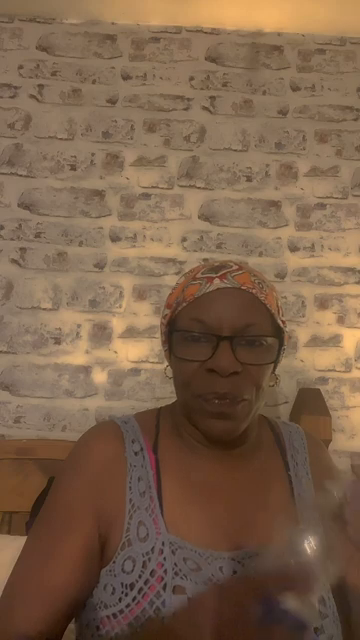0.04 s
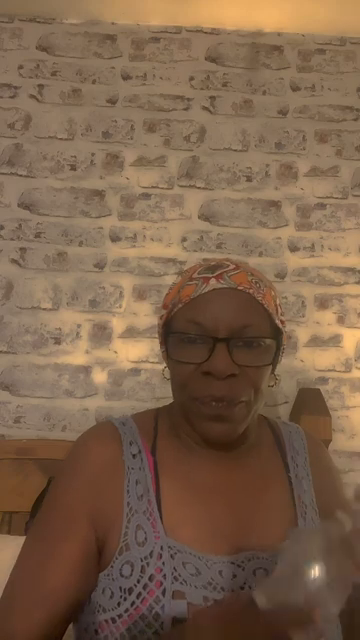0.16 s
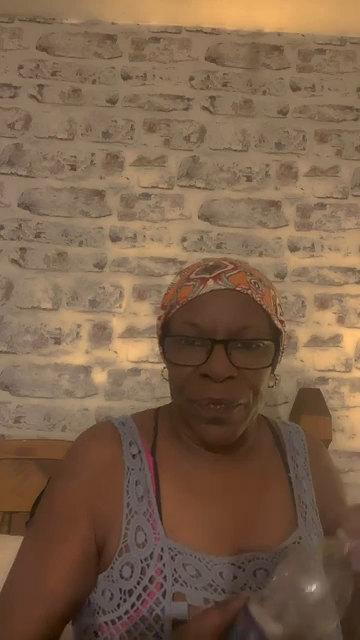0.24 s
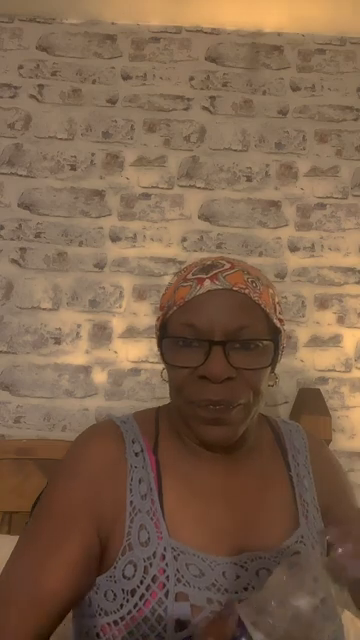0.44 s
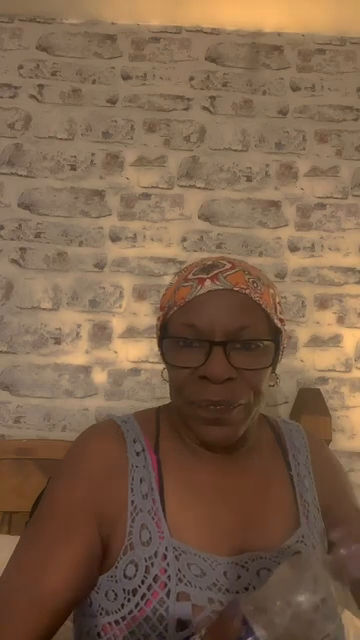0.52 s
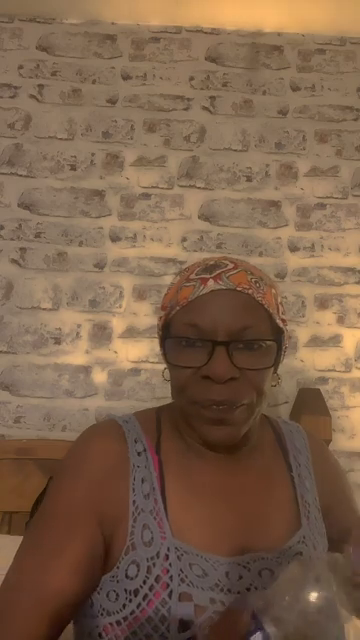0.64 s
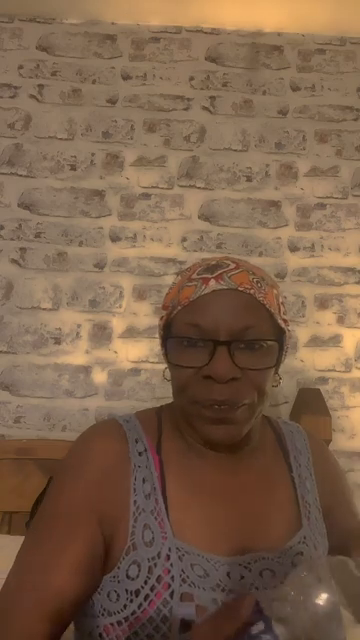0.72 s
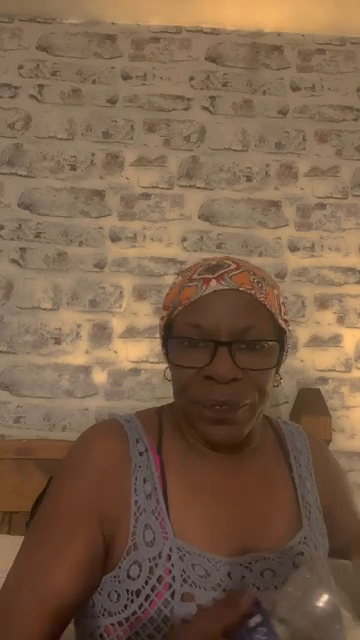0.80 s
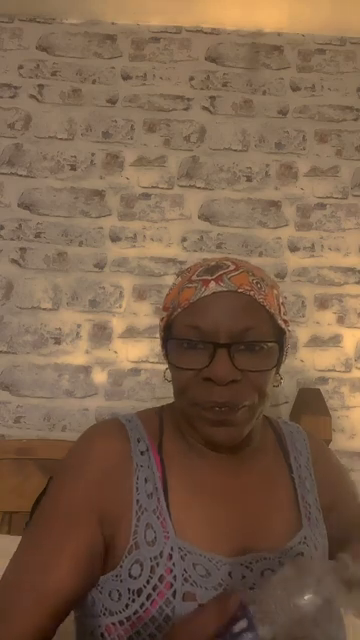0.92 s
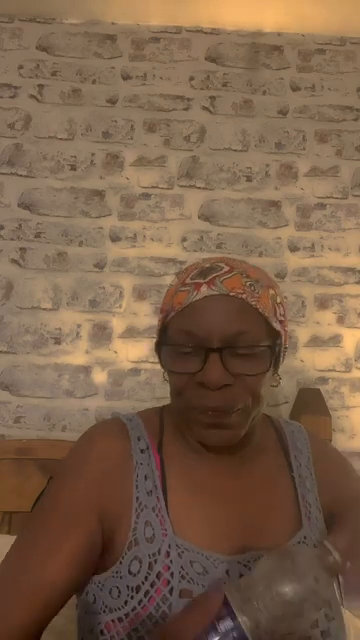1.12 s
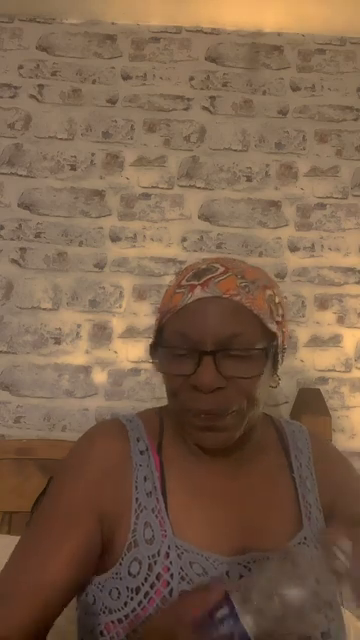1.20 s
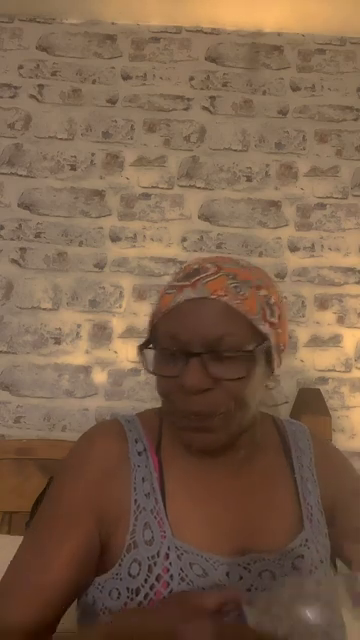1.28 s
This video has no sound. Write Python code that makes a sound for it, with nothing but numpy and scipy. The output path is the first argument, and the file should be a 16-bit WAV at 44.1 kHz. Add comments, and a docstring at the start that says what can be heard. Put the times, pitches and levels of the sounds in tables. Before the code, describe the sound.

A thin plastic bottle is squeezed and handled close to the microphone, its wall popping loudly twice early on, then giving smaller clicks and faint finger rustle over light hiss in a small furnished room.

```python
"""Snapping wall of a thin plastic bottle

A thin plastic water bottle is handled in a small furnished room: dents in its wall snap in and out, some loud, many soft.
Each snap is a short noise burst, dispersed so that its bass trails its treble, with decaying shell modes,
wall echoes and a diffuse tail; loud ones add a cascade of tiny snaps. Slow decaying sines make the whole body boom.
Fingers rustle as shaped noise with ticks, over a swelling low rumble and a steady hiss."""
import sys
import numpy as np
from scipy import signal
from scipy.fft import rfft, irfft, next_fast_len
from scipy.io import wavfile

SR = 44100
rng = np.random.default_rng(int(sys.argv[2]) if len(sys.argv) > 2 else 0)


def how_loud(loudness_db):
    """Turn decibels into a plain amplitude multiplier (0 dB gives 1, 20 dB gives 10)."""
    steps = np.asarray(loudness_db, float) / 20
    return 10 ** steps


def persist_wave(psi):
    """Save psi, clipped to +-1, as 16-bit WAV."""
    counts = np.round(np.clip(psi, -1, 1) * 32767).astype(np.int16)
    wavfile.write(sys.argv[1], SR, np.atleast_2d(counts).T)


N = 59535  # length [samples]

# Dents that snap: (time [s], level near 3 kHz before CRACK_DB [dB],
# then relative to it: bass [dB], low middle [dB], upper middle [dB], treble [dB])
SNAPS = [(0.0354, -30.5, -8, 15.5, -4, -5), (0.099, -50, -8, -8, 0, 9), (0.103, -30, -28, -4.5, -21, -3.5),
         (0.112, -36.5, -11.5, -13, -1.5, -3), (.2166, -14, 2.5, 3, 8, 5.5), (.2232, -19.5, -22, 0, 9, -22),
         (0.252, -27, -21, -16, -8, 3), (0.3721, -10, -7, -1.5, -2.5, 8.5),
         (.3795, -12.5, -8, -3.5, -16, -4), (0.3835, -16, -6.5, 7.5, -1, 8.5),
         (0.3911, -37, -25, -6, -12, 3), (0.524, -25.5, 0, -11, -2, -11.5),
         (0.5253, -28, -4, -10, -3.5, -3.5), (.5356, -24, -12, -15, -9, -7),
         (0.5745, -24.5, -12.5, 4.5, -8, -8), (0.6501, -21.5, -3, -2.5, 1.5, 15.5),
         (0.6576, -32, -30, 10.5, 2, 16), (0.667, -45, 4, -21, 19.5, 27.5), (0.769, -33.5, 2, 0.5, -4, -12),
         (0.777, -29.5, -3, -1, -8, -9), (0.781, -24, -1, -1, -8, -8), (0.8657, -23, -7, -12, -14, -7.5),
         (0.872, -26, -11, -13, -9, -10), (.942, -42.5, -5, -3, 6, 4), (0.999, -55, -14, -3, 7, 0),
         (1.0021, -30, -2.5, 3, -3.5, 2), (1.0226, -34, -13, -18, -2, -14),
         (1.0288, -45, -25, 9.5, -4, -11), (1.0399, -34, -8, 4, -1, 0), (1.0455, -31.5, 2.5, 0, 0, -7),
         (1.302, -30, -8, -1, -5, -6), (1.306, -36, 7, 11.5, -7, -5), (1.335, -40, -11, -20, -13, -9),
         (1.346, -33.5, 2, -3, -16, 0)]
# Frequencies of the snap's tone: bass, low middle, reference, upper middle, treble, very top: (frequency [Hz])
TONE_HZ = [450, 1350, 2900, 5000, 9500, 14000]
# Modes of the shell: (frequency [Hz], relative level [dB], t60 [s])
SHELL_MODES = [(344, -11, 0.15), (505, -3, 0.082), (636, -4, 0.1), (1342, -1, 0.023), (1590, -6.5, 0.032),
               (2228, -0.5, 0.02), (2774, 4.5, 0.025), (4430, -17, 0.0085), (5683, 8, 0.024)]
# Early reflections from the walls: (delay [s], level [dB])
WALL_ECHOES = [(.0072, -14), (0.0121, -19), (.0185, -20.5)]
# Reverberation time of the room: (frequency [Hz], t60 [s])
ROOM_T60 = [(150, 0.08), (500, 0.34), (1500, 0.18), (4000, 0.24), (9000, 0.25), (15000, 0.057)]
# Whole-bottle resonances as large dents move: (time [s], level [dB], frequency [Hz], t60 [s])
BOOMS = [(.218, -26, 217.4, 0.22), (0.374, -28.5, 183, 0.13), (.785, -36, 168.5, 0.089),
         (0.875, -49, 209, 0.075), (1.006, -40.5, 176, 0.075), (1.049, -40, 166, 0.064),
         (1.306, -42.5, 176, 0.14)]
# Course of the finger friction: (time [s], level [dB])
RUSTLE_LEVEL = [(0, -53), (0.092, -60.5), (.15, -62.5), (.2, -55.5), (.47, -65.5), (.51, -47.5),
                (.6, -57.5), (.72, -73), (.8, -73), (.93, -57), (.99, -65.5), (1.06, -68), (1.12, -67.5),
                (1.17, -52.5), (1.218, -56.5), (1.27, -73), (1.319, -48), (1.35, -44)]
# Spectrum of the finger friction: (frequency [Hz], relative density [dB per Hz])
RUSTLE_SPECTRUM = [(120, -53), (200, -24), (432, -12.5), (1180, -3), (1870, -18), (2290, -4), (3370, -12),
                   (16000, -30)]
# Course of the low noise: (time [s], level [dB])
RUMBLE_LEVEL = [(0, -77), (.49, -61), (.54, -54), (.62, -61.5), (.7, -72), (.85, -92), (0.888, -52.5),
                (.95, -72), (1.281, -66), (1.331, -54.5)]
# Spectrum of the low noise: (frequency [Hz], relative density [dB per Hz])
RUMBLE_SPECTRUM = [(35, -36), (65, -12), (110, -4.5), (170, -3), (300, -50)]
# Spectrum of the steady noise: (frequency [Hz], relative density [dB per Hz])
HISS_SPECTRUM = [(15, -47), (25, -24.5), (197, 2), (313, -6.5), (651, -8), (1390, -16.5), (4360, -23.5),
                 (4730, -20.5), (8830, -12), (14400, -18), (16500, -14)]
# Overall colouring of the snaps, with little left above 16 kHz: (frequency [Hz], gain [dB])
SNAP_COLOUR = [(100, -27), (150, -8.5), (260, 10.5), (5400, 3), (6400, -2.5), (8200, 4.5), (9500, 5),
               (10000, -6.5), (12000, -4), (15700, 1), (16200, -26)]

CRACK_S, RISE_S, CRACK_DB = 0.0088, 0.0005, 15  # burst t60 and rise before evening; gain of the whole snap
EVEN = 0.6  # how far the crack's spectrum is evened out, 0-1
LAG_S, LAG_HZ = 0.0022, 400  # bending-wave delay at LAG_HZ, before the delay at the very top is taken off
SHELL_DB, SHELL_SCATTER_DB = -36, 3  # level of the modes, and its random spread per mode
LOUD_DB = -24  # louder snaps set off a cascade
SOFT_TOP_DB = -5  # soft snaps are duller at the very top
CASCADE_DB, CASCADE_S = -3, 0.2  # energy over the crack; t60
CASCADE_PER_S, CASCADE_SPREAD_DB = 1500, 3.5
ROOM_DB, ROOM_GAP_S = -8, 0.004  # energy of the tail over the crack; time scale of its onset
BOOM_RISE_S = 0.0024
TICKS_PER_S, TICK_SPREAD_DB, TICK_SHARE = 1500, 2, 0.2  # share: of the power, before the spectrum is shaped
HISS_DB = -54.5
TOP_HZ, STEADY_TOP_HZ = 17100, 15900  # upper limits of the mix, and of the noises, tails and cascades


def unit(x):
    """Normalisation to rms 1."""
    return x / np.sqrt(np.mean(x ** 2) + 1e-20)


def along(points, hz):
    """Linear interpolation of (frequency, value) points on a logarithmic frequency axis."""
    f, v = np.transpose(points)
    return np.interp(np.log(hz + 1), np.log(f + 1), v)


def filtered(x, response):
    """Linear filtering: the spectrum is multiplied by a complex response of frequency."""
    m = next_fast_len(len(x) + 8192)
    hz = np.fft.rfftfreq(m, 1 / SR)
    return irfft(rfft(x, m) * response(hz), m)[:len(x)]


def bottle():
    """Superposition: the snaps add linearly, each at its moment."""
    out = np.zeros(N + SR)
    for s, *levels in SNAPS:
        one = snap(*levels)
        start = round(s * SR) - 64  # snap() begins with 64 samples of padding
        out[start:][:len(one)] += one
    return out[:N]


def snap(db, bass_db, low_db, high_db, treble_db):
    """Impulsive buckling: a crack and shell modes, dispersed in the wall and answered by the room."""
    t = np.arange(SR // 3) / SR
    direct = crack(t) + shell_ring(t)
    loud = db + max(treble_db, 0) > LOUD_DB
    after = how_loud(ROOM_DB) * room_tail() + loud * how_loud(CASCADE_DB) * cascade(t)
    sound = filtered(direct, wall_echoes) + filtered(after, lambda hz: hz < STEADY_TOP_HZ)
    very_top_db = treble_db + SOFT_TOP_DB * (1 - loud)
    tone = list(zip(TONE_HZ, [bass_db, low_db, 0, high_db, treble_db, very_top_db]))
    padded = np.pad(sound, (64, 0))  # space for the pitches that come early
    shaped = filtered(padded, lambda hz: how_loud(along(tone, hz)) * bending_dispersion(hz))
    return how_loud(db + CRACK_DB) * shaped


def crack(t):
    """Impulsive excitation: a decaying noise burst, its spectrum partly evened, of energy 1."""
    t = t[:512]
    burst = rng.standard_normal(512) * how_loud(-60 * t / CRACK_S) * (1 - np.exp(-t / RISE_S))
    spectrum = rfft(burst)
    evened = irfft(spectrum / (np.abs(spectrum) + 1e-9) ** EVEN)
    evened = evened * np.minimum(1, np.arange(512, 0, -1) / 400)  # fades to the end
    return np.pad(evened / np.linalg.norm(evened), (0, SR // 3 - 512))


def shell_ring(t):
    """Modal superposition: the shell rings as exponentially damped sines."""
    ring = np.zeros(len(t))
    for hz, level, t60 in SHELL_MODES:
        scatter = rng.normal(0, SHELL_SCATTER_DB)
        ring += how_loud(level + scatter - 60 * t / t60) * np.sin(2 * np.pi * hz * t)
    return how_loud(SHELL_DB) * ring


def bending_dispersion(hz):
    """Bending-wave dispersion: group delay falls as one over the root of frequency."""
    # group delay integrated over frequency, less the delay at the very top
    cycles = LAG_S * (2 * np.sqrt(LAG_HZ * hz) - hz * np.sqrt(LAG_HZ / TONE_HZ[-1]))
    return np.exp(-2j * np.pi * cycles)


def cascade(t):
    """Random impulse process: a fading crowd of tiny noise bursts, energy 1."""
    struck = rng.random(len(t)) < CASCADE_PER_S / SR
    hits = struck * how_loud(CASCADE_SPREAD_DB * rng.standard_normal(len(t)) - 60 * t / CASCADE_S)
    envelope = np.convolve(hits, how_loud(-60 * t[:256] / CRACK_S))[:len(t)]
    crowd = envelope * rng.standard_normal(len(t))
    return crowd / (np.linalg.norm(crowd) + 1e-9)


def wall_echoes(hz):
    """Specular reflection: each wall adds a delayed, weaker copy."""
    return 1 + sum(how_loud(level) * np.exp(-2j * np.pi * hz * delay) for delay, level in WALL_ECHOES)


def room_tail():
    """Diffuse reverberation: fresh noise of energy 1 decays at a rate set by frequency."""
    hz, t, z = signal.stft(rng.standard_normal(SR // 3), SR, nperseg=128)
    decay = how_loud(-60 * t / along(ROOM_T60, hz)[:, None])
    tail = signal.istft(z * decay, SR, nperseg=128)[1][:SR // 3]
    onset = 1 - np.exp(-(np.arange(len(tail)) / SR / ROOM_GAP_S) ** 2)
    tail = tail * onset
    return tail / np.linalg.norm(tail)


def booms():
    """Damped free vibration: the whole body rings as low decaying sines."""
    out, t = np.zeros(N + SR), np.arange(SR // 3) / SR
    rise = 1 - np.exp(-t / BOOM_RISE_S)
    for s, db, hz, t60 in BOOMS:
        ring = how_loud(db - 60 * t / t60) * np.sin(2 * np.pi * hz * t)
        out[round(s * SR):][:len(t)] += ring * rise
    return out[:N]


def noise_course(noise, course, spectrum):
    """Amplitude modulation: spectrally shaped noise follows a level course."""
    s, db = np.transpose(course)
    level = how_loud(np.interp(np.arange(N) / SR, s, db))
    return level * unit(filtered(noise, lambda hz: how_loud(along(spectrum, hz))))


def fingers():
    """Sliding friction: skin on plastic gives soft noise mixed with tiny random ticks."""
    struck = rng.random(N) < TICKS_PER_S / SR
    ticks = struck * how_loud(TICK_SPREAD_DB * rng.standard_normal(N)) * rng.standard_normal(N)
    rub = np.sqrt(TICK_SHARE) * unit(ticks) + np.sqrt(1 - TICK_SHARE) * rng.standard_normal(N)
    return noise_course(rub, RUSTLE_LEVEL, RUSTLE_SPECTRUM)


def rumble():
    """Low-frequency random vibration: band-shaped noise swells while the hands shift."""
    return noise_course(rng.standard_normal(N), RUMBLE_LEVEL, RUMBLE_SPECTRUM)


def hiss():
    """Stationary random noise: room air and microphone give a shaped steady hiss."""
    return how_loud(HISS_DB) * unit(filtered(rng.standard_normal(N), lambda hz: how_loud(along(HISS_SPECTRUM, hz))))


def scene():
    """Superposition: snaps coloured by an overall response, with booms, rustle, rumble and hiss."""
    steady = filtered(fingers() + rumble() + hiss(), lambda hz: hz < STEADY_TOP_HZ)
    snaps = filtered(bottle(), lambda hz: how_loud(along(SNAP_COLOUR, hz)))
    return (snaps + booms() + steady)[None]


def top_cut(x):
    """Nothing passes above the cut-off."""
    return signal.sosfilt(signal.butter(12, 17140, fs=SR, output="sos"), x)


def record(dry):
    """Band limitation: nothing from TOP_HZ upwards enters the finished mix."""
    mix = filtered(dry[0], lambda hz: hz < TOP_HZ)[None]
    return top_cut(mix)


dry = scene()
out = record(dry)
persist_wave(out)
```